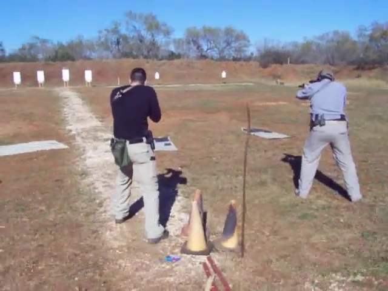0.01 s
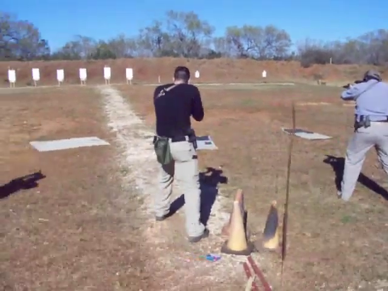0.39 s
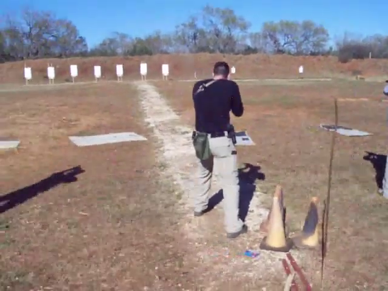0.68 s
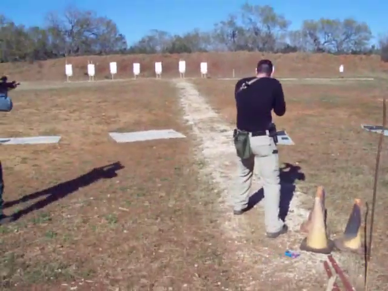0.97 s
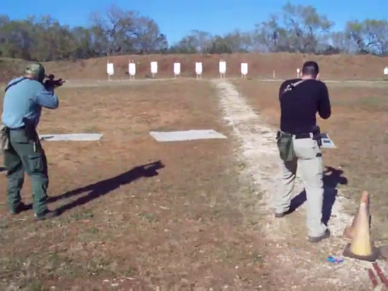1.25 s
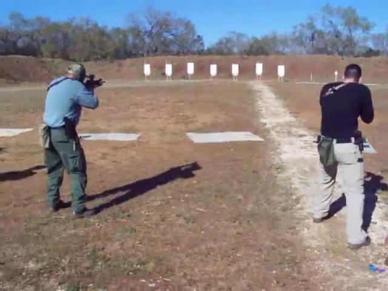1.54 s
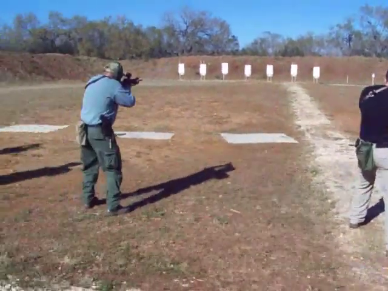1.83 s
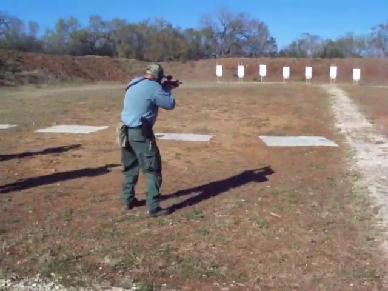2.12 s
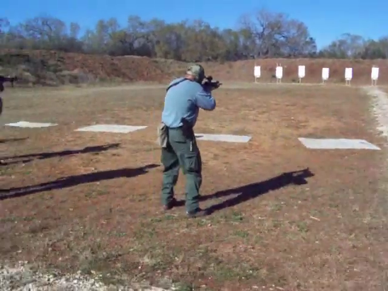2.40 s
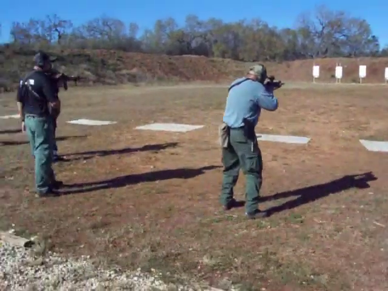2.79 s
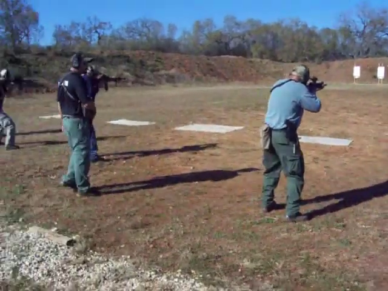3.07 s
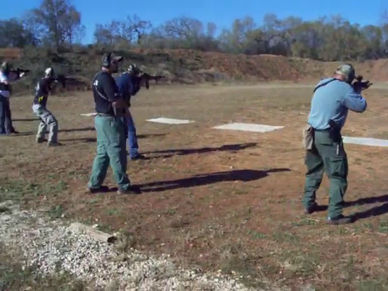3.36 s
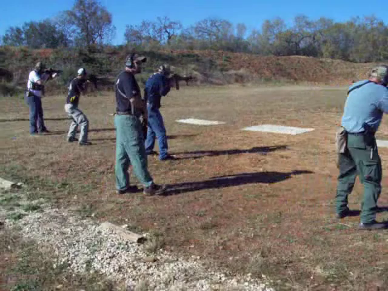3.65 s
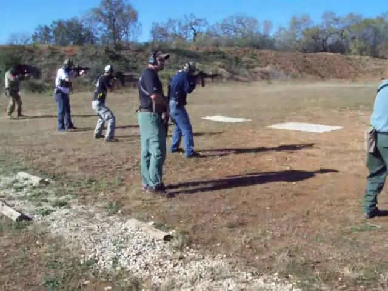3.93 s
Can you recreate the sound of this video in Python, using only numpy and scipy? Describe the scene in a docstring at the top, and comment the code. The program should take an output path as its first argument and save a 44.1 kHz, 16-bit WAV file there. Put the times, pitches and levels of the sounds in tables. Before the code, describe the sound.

Loud rifle shots crack close by on an outdoor range, overloading the microphone. One fires at the start, two around 0.6 and 0.8 seconds, then a heavy one at 1.7 opens a quick run until 2.4. More follow from 3 to 3.9 seconds. Grainy echoes with sharp ticks trail the shots. Duller distant shots land near 1, 2.6 and 3.6 seconds over a faint wind rumble.

```python
"""An open rifle range, a few metres from a line of people shooting. Each near shot is a bright crack, a blast
from the muzzle and a rush of sound scattered by the ground, loud enough to overload the microphone. An earth
bank and trees send back a grainy wash of echoes, and sharp ticks sound among them. Thin cracks sound just ahead
of some shots or among the echoes, and duller shots come from farther off. The air hisses faintly, and a low
rumble of wind and far echoes rises in the pauses."""
import sys
import numpy as np
from scipy import signal
from scipy.fft import rfft, irfft, next_fast_len
from scipy.io import wavfile
from scipy.ndimage import uniform_filter1d

SR = 44100
rng = np.random.default_rng(int(sys.argv[2]) if len(sys.argv) > 2 else 0)


def persist_wave(psi):
    """Save psi, clipped to +-1, as 16-bit WAV."""
    counts = np.round(np.clip(psi, -1, 1) * 32767).astype(np.int16)
    wavfile.write(sys.argv[1], SR, np.atleast_2d(counts).T)


N = 176400

# How the rumble rises and falls: (time [s], level [dB])
RUMBLE_LEVELS = [(0, -38), (.25, -33), (.55, -46), (.65, -61), (1.15, -52.5), (1.38, -38.5), (1.52, -35.5),
                 (1.649, -37), (1.72, -48.5), (2.3, -62.5), (2.7, -55.5), (2.9, -37.5), (3.0, -36),
                 (3.079, -44), (3.521, -47), (3.62, -34), (3.77, -26), (3.9, -46)]
# Near shots: (time [s], crack level [dB], crack decay [s], blast delay [s], blast level [dB],
# boom pitch [Hz], scatter level [dB], scatter length [s], echo body [dB], echo treble [dB],
# echo delay [s])
NEAR_SHOTS = [ (0.0187, -16, .003, .0002, 14.5, 215, -12, 0.024, -21.5, -24, 0.16),
              (0.5741, 6, 0.0096, .003, -6.5, 167, -7.5, 0.026, -25, -17, 0.11),
              (0.7534, 4, 0.0063, .0003, 9, 134, -5.5, 0.032, -24.5, -19.5, 0.13),
              (1.6506, 12, 0.0097, .0010, 17.5, 62.7, -3.5, 0.015, -22, -17.5, 0.15),
              (1.8776, 3.5, 0.0045, .003, -5, 110, -12, 0.024, -26.5, -20.5, 0.13),
              (1.9262, -1, .010, .004, -7, 123, -6.5, 0.029, -28, -23.5, 0.15),
              (2.1020, 2, 0.0036, .0003, 5, 121, -6, 0.032, -28, -24.5, .17),
              (2.39, -1.5, 0.0097, .012, -4, 115, -7.5, 0.038, -26.5, -19, 0.087),
              (2.9848, 1.5, 0.011, .002, 1.5, 82, -17, 0.028, -25.5, -17.5, 0.12),
              (3.207, -0.5, 0.0052, .0006, 6, 71, -6, 0.03, -24.5, -25.5, 0.15),
              (3.3482, 8.5, 0.0021, .001, -3.5, 69, -13, 0.022, -27, -20.5, 0.045),
              (3.767, 9, 0.0037, .002, -1.5, 88, -9, 0.026, -29, -22.5, 0.12),
              (3.806, -5, 0.0069, .002, -5.5, 79.6, -7.5, 0.029, -27.5, -21.5, 0.12),
              (3.8904, 6, 0.0036, .001, 0, 86, -23, 0.017, -22.5, -19.5, 0.19)]
# Soft late echoes from the trees: (middle time [s], level [dB], half-width [s])
TREE_ECHOES = [(.21, -38, 0.031), (1.10, -34, 0.025), (1.265, -31, 0.025), (1.302, -26, 0.016),
               (1.425, -33, 0.021), (2.731, -36, 0.04), (2.841, -28, 0.017), (2.905, -25, 0.041),
               (3.70, -30, 0.11)]
# Thin, bright cracks: (time [s], level [dB], length [s])
THIN_CRACKS = [(0.5675, -21, 0.0061), (1.352, -20.5, 0.016), (1.645, -35, 0.0067), (2.977, -20, 0.0054),
               (3.018, -22, 0.0033), (3.367, -9.5, 0.0062), (3.535, -16, 0.0022)]
# Sharp ticks among the echoes: (time [s], level [dB])
SHARP_TICKS = [(0.7453, -7), (0.939, -6), (0.96, -12), (1.695, -7), (1.83, -12), (2.022, -10), (2.042, -15),
               (2.1760, -7.5), (2.286, -12), (2.3070, -7), (2.3258, -13), (3.054, -13), (3.1782, -11)]
# Far shots: (time [s], snap level [dB], knock level [dB], thud level [dB], thud pitch [Hz])
DULL_SHOTS = [(1.005, -6, -12, -16, 539.8), (2.3532, -6.5, -8, -12, 544), (2.63, -10, -9, -4, 604),
              (3.5772, -15, -10.5, -16, 447)]
# The tone of each sound, from bass to treble: (frequency [Hz], relative level [dB])
AIR_TONE = [(20, -17.5), (100, 3.5), (300, 4), (700, -10.5), (1500, -10), (4000, -8), (6500, -41),
            (9000, -40)]
RUMBLE_TONE = [(20, -9.5), (45, -3), (90, -10), (140, -3), (250, -13.5), (500, -22.5), (1200, -45),
               (5000, -42)]
CRACK_TONE = [(100, -4), (600, -15), (1500, -9), (2800, -8), (4100, -0.5), (5300, -8.5), (7200, -15),
              (9000, -20.5)]
BLAST_TONE = [(30, 2), (100, -8), (220, 5), (600, 5), (1200, -7.5), (2500, -7.5), (8000, -64)]
SCATTER_TONE = [(40, -37), (150, -6), (400, 1), (750, 4), (1400, -1.5), (2700, -4), (4000, 2), (5300, -6),
                (7200, -12), (9000, -15)]
ECHO_BODY_TONE = [(30, -30), (110, -13), (250, 3.5), (400, 0.5), (700, 2.5), (1300, -3), (2200, -7),
                  (4000, -5.5), (8000, -54.5)]
ECHO_TREBLE_TONE = [(300, -36.5), (1200, -17), (2200, -7.5), (3100, -6.5), (3850, 0.2), (4550, -1.9),
                    (5300, -8), (7200, -15), (9000, -22)]
TREE_TONE = [(100, -24), (500, -6.5), (1500, -8), (2800, -1.5), (4100, 2), (5300, -10.5), (7200, -20),
             (9000, -29)]
KNOCK_TONE = [(40, -23), (200, 5.5), (450, 8), (900, 0), (1700, -7.5), (2600, -15), (8000, -22.5)]
# How long echoes last: (frequency [Hz], time to fade by 60 dB [s])
ECHO_FADE_TIMES = [(100, 5.7), (500, 3.4), (1500, 2.56), (4000, 2.5), (8000, 1.49)]
# How the recorder colours the sound: (frequency [Hz], gain [dB])
MICROPHONE_TONE = [(20, -9), (50, -3), (6500, 0.5), (7500, -2), (8200, -10.5), (8800, -20.5), (9400, -61.5)]


def amp(db):
    """Turns decibels into a number to multiply by."""
    return 10 ** (np.asarray(db) / 20)


def evened(x):
    """Scales a sound to an average (rms) strength of 1."""
    return x / np.sqrt(np.mean(x ** 2) + 1e-20)


def look_up(table, hz):
    """Reads between a table's rows, with octaves evenly spaced."""
    row_hz, value = np.transpose(table)
    return np.interp(np.log(hz + 1), np.log(row_hz + 1), value)


def add(mix, start_s, sound):
    """Mixes a sound in at its start time."""
    part = mix[max(round(start_s * SR), 0):][:len(sound)]
    part += sound[:len(part)]


def colour(x, tone):
    """Turns each frequency up or down as a tone table says."""
    size = next_fast_len(len(x) + SR // 20)
    gain = amp(look_up(tone, np.fft.rfftfreq(size, 1 / SR)))
    return irfft(rfft(x, size) * gain, size)[:len(x)]


def noise(tone, size):
    """Noise of strength 1 with the given tone."""
    return evened(colour(rng.standard_normal(size), tone))


def wander(seconds, size):
    """A smooth random wobble of strength 1; more seconds make it slower."""
    hz = np.fft.rfftfreq(size, 1 / SR)
    return evened(irfft(rfft(rng.standard_normal(size)) * np.exp(-(hz * seconds) ** 2), size))


def smooth(x, seconds):
    """Follows a signal slowly, evening out quick changes."""
    keep = np.exp(-1 / (seconds * SR))
    return signal.lfilter([1 - keep], [1, -keep], x)


def open_air():
    """The faint, steady hiss of the outdoors."""
    return amp(-41.5) * noise(AIR_TONE, N)


def rumble():
    """Wind and far echoes make a low, lumpy rumble that swells at set times."""
    level_db = np.interp(np.arange(N) / SR, *np.transpose(RUMBLE_LEVELS))
    lumps_db = 2 * wander(0.02, N)
    return amp(level_db + lumps_db) * noise(RUMBLE_TONE, N)


def near_shots():
    """A crack, the muzzle's push of air and roar, then sound bouncing off the ground and firing line."""
    out, t = np.zeros(N), np.arange(SR // 5) / SR
    for start, crack_db, crack_s, delay_s, blast_db, boom_hz, scatter_db, scatter_s, *_ in NEAR_SHOTS:
        crack_shape = np.minimum(t / 0.0011, 1) * np.exp(-t / crack_s)
        add(out, start, amp(crack_db) * crack_shape * noise(CRACK_TONE, len(t)))
        boom_s = 0.0016 * np.exp(0.0758 * blast_db)  # a heavier blast booms longer
        boom = -amp(1) * np.sin(2 * np.pi * boom_hz * t) * np.exp(-t / boom_s)
        roar = np.exp(-t / 0.0032) * noise(BLAST_TONE, len(t))
        add(out, start + delay_s, amp(blast_db) * (boom + roar))
        scatter_shape = np.minimum(t / 0.00074, 1) / np.sqrt(1 + (t / scatter_s) ** 8)
        roughness = amp(2 * wander(0.00098, len(t)))  # separate bounces
        add(out, start, amp(scatter_db) * scatter_shape * roughness * noise(SCATTER_TONE, len(t)))
    return out


def echo(tone, delay_s):
    """Many tiny echoes swell as the bank answers, then linger in the trees. The treble dies first."""
    size, grains_per_s = 2 * SR, 7000
    t = np.arange(size) / SR
    grains = rng.standard_normal(size) * (rng.random(size) < grains_per_s / SR)
    grains *= amp(2.5 * np.minimum(rng.exponential(1, size), 4))  # a few stand out
    # Split the sound into frequency bands so that each fades at its own speed.
    hz, times, bands = signal.stft(evened(colour(grains, tone)), SR, nperseg=256)
    fade = amp(-60 * np.maximum(times - delay_s, 0) / look_up(ECHO_FADE_TIMES, hz)[:, None])
    patches = uniform_filter1d(rng.standard_normal(bands.shape), size=4, axis=0)  # uneven in pitch
    patches = evened(uniform_filter1d(patches, size=6, axis=1))  # and in time
    wash = signal.istft(bands * fade * amp(2.5 * patches), SR, nperseg=256)[1][:size]
    early_share, late_share = 0.68, 0.49  # heard before and after the bank answers
    rise_s, hold_s, fall_s = 0.011, 0.067, 0.031
    swell = early_share + (1 - early_share) * (1 + np.tanh((t - delay_s) / rise_s + 1)) / 2
    settle = late_share + (1 - late_share) * (1 - np.tanh((t - delay_s - hold_s) / fall_s)) / 2
    return wash * swell * settle * np.minimum(t / 0.02, 1)


def bank_echoes():
    """A wash of echoes follows each near shot, patchy as it runs along the earth bank."""
    out = np.zeros(N)
    for start, *_, body_db, treble_db, delay_s in NEAR_SHOTS:
        body = amp(body_db) * echo(ECHO_BODY_TONE, delay_s)
        treble = amp(treble_db) * echo(ECHO_TREBLE_TONE, delay_s)
        add(out, start, (body + treble) * amp(0.6 * wander(0.018, len(body))))
    return out


def tree_echoes():
    """The trees send sound back late, in soft, bright swells."""
    t = np.arange(N) / SR
    swells = sum(amp(db) * np.exp(-((t - middle) / width) ** 2) for middle, db, width in TREE_ECHOES)
    return swells * noise(TREE_TONE, N) * amp(0.6 * wander(0.003, N))


def thin_cracks():
    """Thin, bright cracks, some just ahead of a near shot, others alone among the echoes."""
    out, t = np.zeros(N), np.arange(SR // 10) / SR
    for start, db, length_s in THIN_CRACKS:
        shape = np.minimum(t / 0.001, 1) / np.sqrt(1 + (t / length_s) ** 8)  # rise, hold, drop
        add(out, start, amp(db) * shape * noise(ECHO_TREBLE_TONE, len(t)))
    return out


def ticks():
    """Bright ticks under a millisecond long, each a bit of noise and a high ping."""
    out, t = np.zeros(N), np.arange(SR // 20) / SR
    ping = 2.46 * np.cos(2 * np.pi * 4200 * t)
    shape = np.exp(-(t / 0.0005) ** 2)
    for start, db in SHARP_TICKS:
        add(out, start, amp(db) * shape * (noise(CRACK_TONE, len(t)) + ping))
    return out


def dull_shots():
    """A far rifle gives a short snap, a broad knock and a hollow thud."""
    out, t = np.zeros(N), np.arange(SR // 10) / SR
    snap_s, knock_s, thud_s = 0.0013, 0.0032, 0.003  # decay times
    thud_shape = 2 * np.sqrt(t / thud_s) * np.exp(-t / thud_s)
    for start, snap_db, knock_db, thud_db, thud_hz in DULL_SHOTS:
        snap = amp(snap_db) * np.exp(-t / snap_s) * noise(CRACK_TONE, len(t))
        knock = amp(knock_db) * np.exp(-t / knock_s) * noise(KNOCK_TONE, len(t))
        thud = -amp(thud_db) * thud_shape * np.sin(2 * np.pi * thud_hz * t)
        add(out, start, snap + knock + thud)
    return out


def scene():
    """Adds the shots, their echoes and the background into one channel."""
    near_fire = near_shots() + bank_echoes() + tree_echoes()
    return (near_fire + rumble() + dull_shots() + thin_cracks() + ticks() + open_air())[None]


def record(dry):
    """The microphone overloads, the volume dips after loud sounds, and the recorder loses high treble and clips
    peaks."""
    overload, ceiling = 0.74, 0.7
    dip_above_db, dip_share, recover_db_per_s = -16, 0.4, 73.5
    rounded = dry[0] / (1 + abs(dry[0] / overload) ** 3) ** (1 / 3)  # squashes big peaks
    level_db = 10 * np.log10(smooth(rounded ** 2, 0.0059) + 1e-12)
    excess_db = np.maximum(level_db - dip_above_db, 0)
    # Each dip wears off at a steady rate unless a louder sound renews it.
    recovery_db = np.arange(N) / SR * recover_db_per_s
    dip_db = np.maximum.accumulate(dip_share * excess_db + recovery_db) - recovery_db
    dipped = rounded * amp(-smooth(dip_db, 0.019))
    clipped = np.clip(colour(dipped, MICROPHONE_TONE), -ceiling, ceiling)
    treble_cut = signal.firwin(511, cutoff=16200, window=("kaiser", 9), fs=SR)
    return signal.oaconvolve(clipped, treble_cut, "same")[None]


dry = scene()
out = record(dry)
persist_wave(out)
```